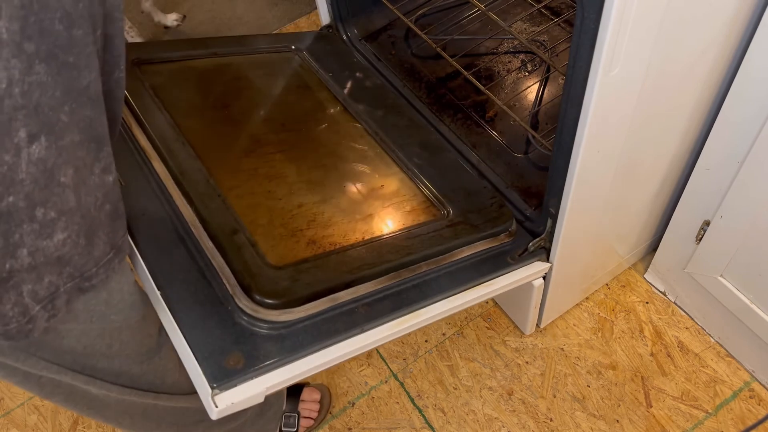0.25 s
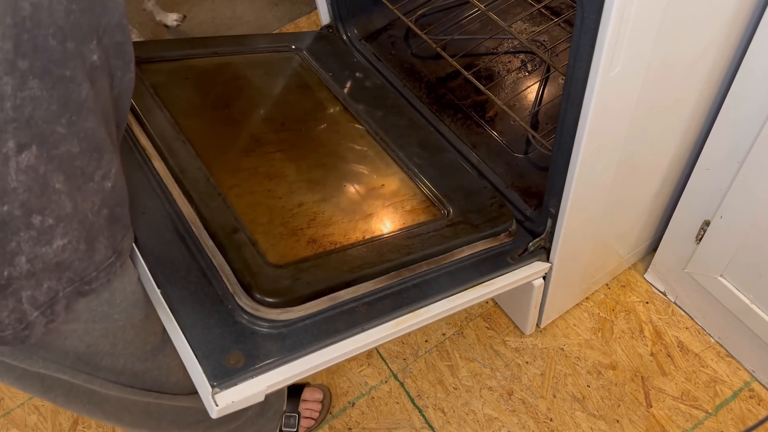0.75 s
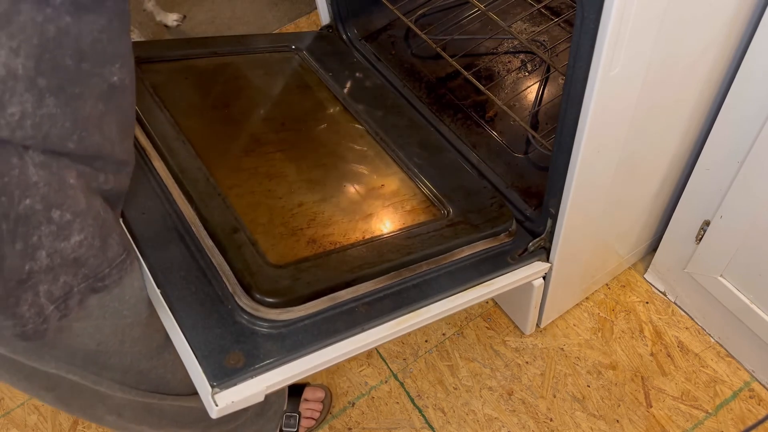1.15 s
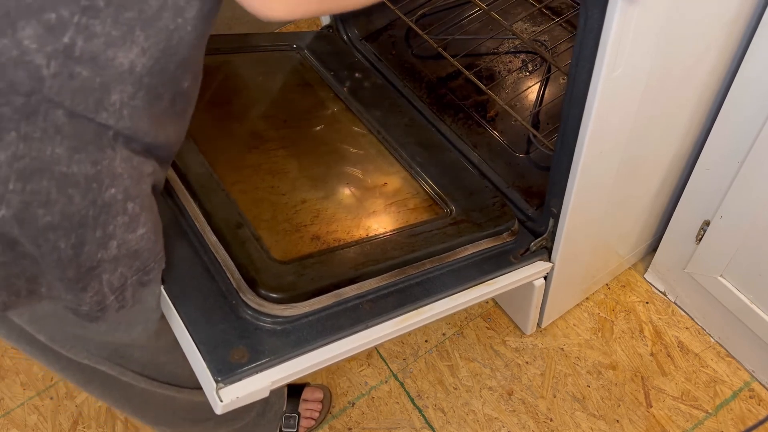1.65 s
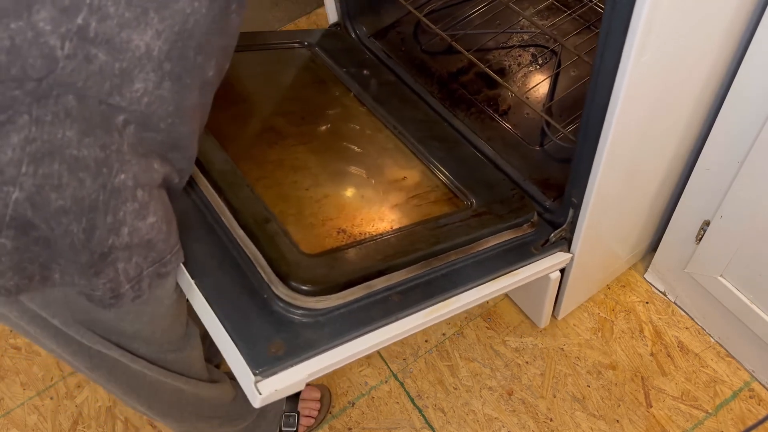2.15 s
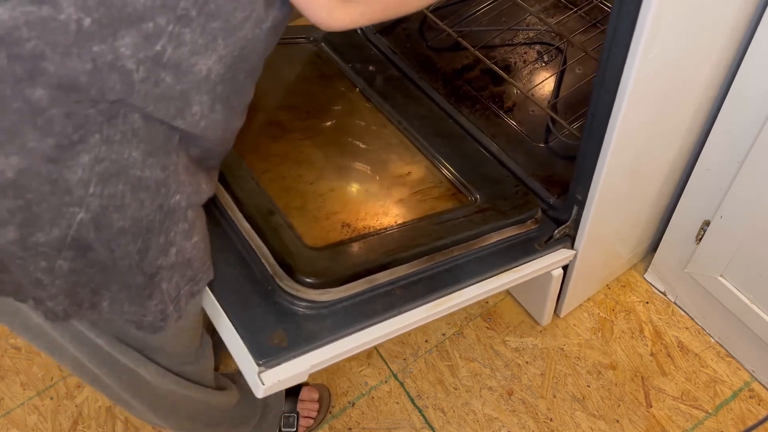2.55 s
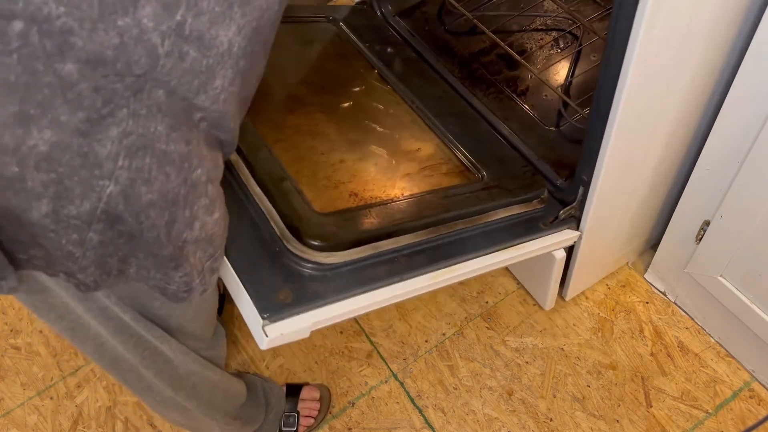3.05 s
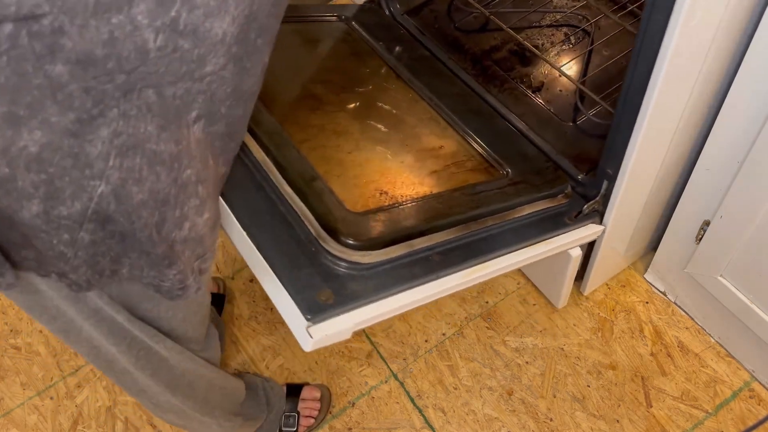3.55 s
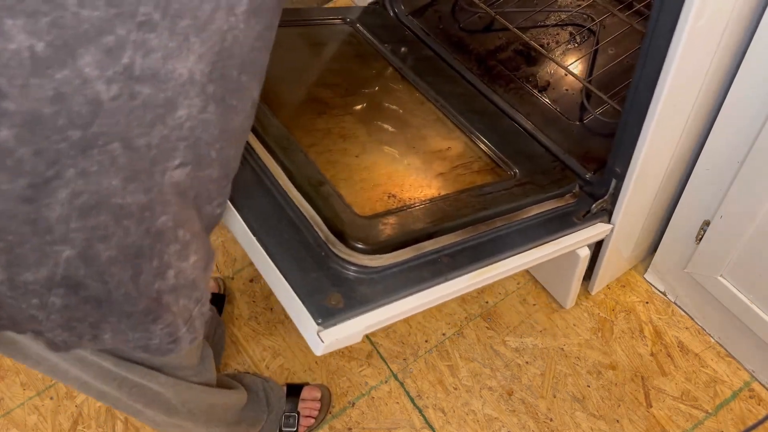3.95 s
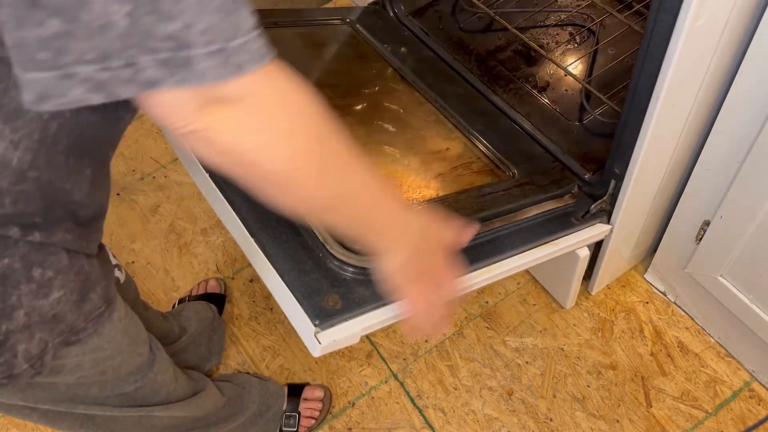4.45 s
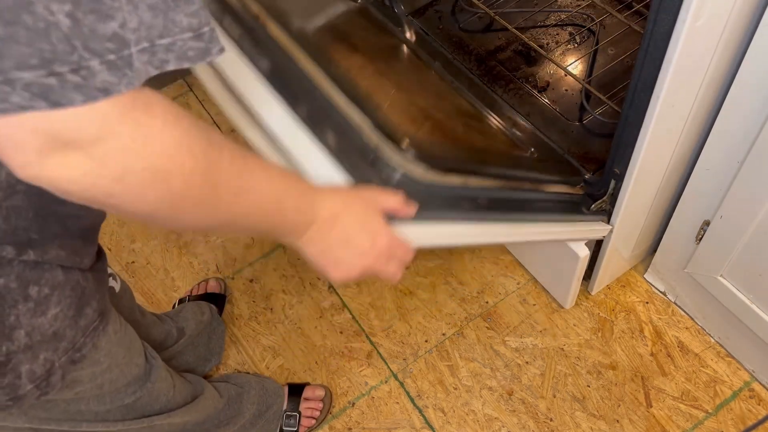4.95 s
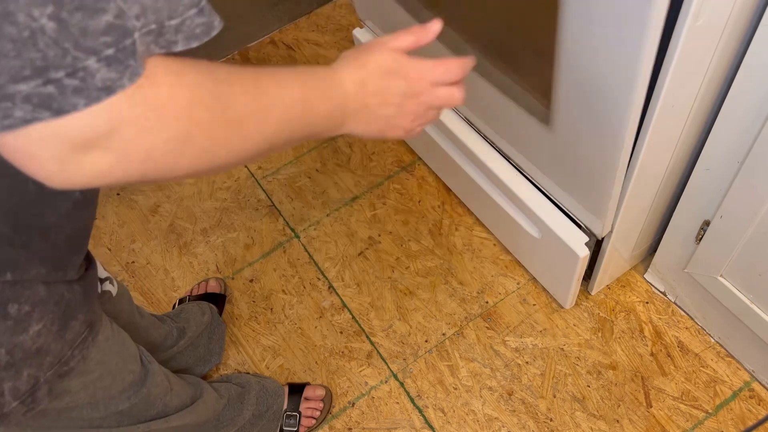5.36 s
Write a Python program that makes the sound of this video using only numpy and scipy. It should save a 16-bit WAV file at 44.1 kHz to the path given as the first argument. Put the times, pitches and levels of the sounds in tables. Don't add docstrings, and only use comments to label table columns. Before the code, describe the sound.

A quiet bare kitchen with a steady low hum around 120 Hz and soft air; a faint rustle fades within the first half second. At about 1.7 s a heavy sheet-metal stove is shoved: hollow panel bangs, the strongest near 1.8 s, with gritty skids and rack ticks until 2.0. A weaker scrape bridges to a knock at 2.5, then a dense run of loud clangs, scraping and bright rattles from 2.65 to 3.4 s, with low floor booms beneath. Lighter knocks and ticks follow at 3.6, 3.8 and 3.9. At 4.1 a short rubbery hinge squeak leads into a dull thump at 4.23; a small bump comes at 4.67. After a lull, the door touches its frame from 5.27 and latches with a crisp clack at 5.4, rattling once more at 5.5. Short room echo; stereo microphone a metre away, stove leaning right.

```python
import sys
import numpy as np
from scipy import signal
from scipy.fft import rfft, irfft
from scipy.io import wavfile
from scipy.ndimage import uniform_filter1d

SR = 44100
rng = np.random.default_rng(int(sys.argv[2]) if len(sys.argv) > 2 else 0)


def store_wav(level_fs):
    pcm = np.round(np.clip(np.atleast_2d(level_fs), -1, 1) * 32767)
    wavfile.write(sys.argv[1], SR, pcm.T.astype(np.int16))


def invert_db(x):
    u = np.asarray(x, float) / 20
    return 10 ** u


N = 247180
HZ = np.fft.rfftfreq(N, 1 / SR)
TIME = np.arange(N) / SR
RISE_S = .0004

# (frequency [Hz], level [dB], t60 [s])
PANELS = [(152, -11.5, 0.32), (213, -1, 0.07), (248.5, -8, 0.084), (308, -4, 0.072), (400, -10, 0.15),
          (450, -12, 0.44), (528.4, -2.5, 0.05), (610, -1, 0.053), (705, -3, 0.6), (774, -26, 0.13),
          (857, 5.5, 0.13), (1043, 1, 0.18), (1187, -9.5, 0.27), (1288, 1.5, 0.14), (1490, -19, .2),
          (1520, -14.5, 0.1), (1780, -24, 0.11), (1880, -17, 0.11)]
# (frequency [Hz], correlation [-1..1])
SAME = [(30, .996), (60, .95), (120, .95), (340, .72), (860, .42), (1400, .25), (2000, .15), (7000, .1)]


def evened(x):
    return x / np.sqrt(np.mean(x ** 2) + 1e-20)


def read(points, hz):
    f, value = np.transpose(points)
    return np.interp(np.log(hz + 1), np.log(f + 1), value)


def add(mix, s, sound):
    part = mix[..., round(s * SR):][..., :sound.shape[-1]]
    part += sound[..., :part.shape[-1]]


def paired(gain):
    left, other = rfft(rng.standard_normal((2, N)))
    same = np.clip(read(SAME, HZ), -1, 1)
    right = same * left + np.sqrt(1 - same ** 2) * other
    return evened(irfft(gain * np.array([left, right]), N))


def peak(hz, width):
    return 1 / np.sqrt(1 + (2 * (HZ - hz) / width) ** 2)


def rings(modes, t, scatter_db):
    hz, db, t60 = np.transpose(modes)[:, :, None]
    luck, phase, turn = rng.standard_normal((3, len(modes), 1))
    skew = np.arccos(np.clip(read(SAME, hz), -1, 1)) * .6 * np.sign(turn)
    size = invert_db(db + scatter_db * luck - 60 * t / t60)
    pair = [(size * np.sin(2 * np.pi * hz * t + phase + side * skew)).sum(0) for side in (0, 1)]
    return np.array(pair) / np.sqrt((size[:, 0] ** 2).sum())


def struck(t, rise, hold, t60):
    decay = invert_db(-60 * np.maximum(t - hold, 0) / np.clip(t60, .03, 2))
    return (1 - np.exp(-t / rise)) * decay


def clusters(blows):
    out, t = np.zeros((2, N)), np.arange(16000) / SR
    for s, hz, db, t60, hold in blows:
        cluster = [(hz, 0, 9), (hz * 1.03 + 8, -9, 9), (hz * .955 - 8, -10, 9), (hz * 1.075 + 15, -12, 9)]
        unrest = evened(uniform_filter1d(rng.standard_normal(len(t)), size=300))
        chatter = invert_db(2 * unrest * np.minimum(t / .02, 1))
        ring = rings(cluster, t, scatter_db=1.5) * chatter
        add(out, s, invert_db(db) * ring * struck(t, 2 * RISE_S, hold, t60))
    return out


def room_tone():
    # (frequency [Hz], level [dB per Hz])
    air = [(12, -38), (20, -14.5), (70, -8.5), (123, -5.5), (146, -8), (177, -15), (310, -14), (450, -24.5),
           (897, -28), (1330, -28), (3000, -34.5), (6500, -43), (8200, -52.5), (16000, -91)]
    # (frequency [Hz], level [dB], width [Hz; first: wobble dB])
    hum = [(120.06, -44, .6), (57.2, -51.5, 5.7), (243.3, -66, 1.3), (309, -62, 4.4), (506.2, -64, 3.8),
           (652, -68, 5.3), (901, -65.5, 16)]
    fan = sum(invert_db(db) * paired(peak(hz, width) ** 2) for hz, db, width in hum[1:])
    hz, db, wobble_db = hum[0]
    drift = evened(uniform_filter1d(rng.standard_normal(N), size=9000))
    side_db = np.array([[.7], [-.7]])
    mains = invert_db(db + wobble_db * drift + side_db) * np.sqrt(2) * np.sin(2 * np.pi * hz * TIME)
    return invert_db(-50.5) * paired(invert_db(read(air, HZ))) + fan + mains


def slide(grit, wash, chatter, boom):
    # (time [s], level over rest [dB])
    shove = [(1.55, 0.1), (1.68, 5), (1.85, 16), (1.92, 15), (2.02, 7), (2.2, 6.5), (2.46, 3), (2.71, 15),
             (2.82, 12), (3.04, 15), (3.17, 12), (3.28, 18), (3.5, 12), (3.85, 11.5), (4.07, 5.5),
             (4.8, 0.8), (5.25, 2), (5.6, 9.5)]
    # (start [s], length [s], grit level [dB], panel chatter level [dB])
    skids = [(1.70, .09, -51, -56), (1.77, .07, -46, -50), (1.87, .06, -50, -55), (1.95, .09, -50, -50),
             (2.07, .25, -57.5, -53), (2.335, .12, -66, -56), (2.66, .13, -45.5, -36), (2.76, .1, -54, -48),
             (2.84, .07, -47, -60), (2.935, .07, -44, -37), (3.06, .07, -55, -36), (3.31, .08, -55, -42),
             (4.06, .18, -61, -60), (4.23, .12, -61, -45), (4.3, .14, -62, -54), (4.42, .05, -70, -52),
             (4.46, .14, -64, -60), (4.65, .15, -71, -54), (5.0, .1, -75, -66), (5.47, .13, -65, -47)]
    push = np.interp(TIME, *np.transpose(shove))
    slips = uniform_filter1d(rng.standard_normal(N), size=250)
    slips = evened(uniform_filter1d(slips, size=250))
    scrape = invert_db(-83 + 3.3 * push - .065 * push ** 2)
    scrape = scrape + invert_db(-61 - 60 * TIME / .5)
    skid = np.zeros((2, N))
    for s, length, grit_db, chatter_db in skids:
        shape = signal.windows.tukey(round(length * SR), .8)
        add(skid, s, invert_db(np.array([[grit_db], [chatter_db]])) * shape)
    skid = skid * invert_db(1.2 * slips)
    grit_gain = np.hypot(scrape * invert_db(1.08 * slips), skid[0])
    drone = invert_db(-54 + push + 0.81 * slips) * wash
    rumble = invert_db(-68 + .6 * push) * boom
    return grit_gain * grit + skid[1] * chatter + drone + rumble


def bumps(low, high):
    # (time [s], peak level [dB], struck spot [Hz], upper panels relative to it [dB])
    blows = [(1.668, -35, 356, -3.5), (1.74, -30, 238, -14), (1.775, -16, 258, -9.5),
             (1.858, -24, 428, -19), (1.929, -37, 546, -7), (1.954, -35, 1070, 1.5), (2.481, -36, 240, -3),
             (2.549, -22.5, 546, -4.5), (2.659, -17, 252, -6), (2.719, -27.5, 198, -10),
             (2.917, -17.5, 533, -8.5), (3.025, -21, 232, -9.5), (3.129, -26.5, 1290, -14.5),
             (3.246, -23.5, 435, -8.5), (3.294, -21.5, 250, -19), (3.415, -30, 610, -9),
             (3.532, -30, 250, -9), (3.585, -30, 439, -12), (3.779, -37, 780, -5.5),
             (3.934, -32, 1297, -12), (4.235, -23.5, 225, -12), (4.665, -33, 323, -12),
             (5.27, -35.5, 369, -5), (5.349, -37, 315, -9), (5.417, -33.5, 1310, -6),
             (5.444, -32.5, 1076, -21), (5.509, -33, 844, -0.5)]
    out, t = np.zeros((2, N)), np.arange(20000) / SR
    modes = np.array(PANELS)
    upper = modes[:, 0] > 640
    for s, db, hz, bright_db in blows:
        cut = slice(round(s * SR), round(s * SR) + len(t))
        u = t[:low[:, cut].shape[1]]
        t60 = .27 - .004 * (db + 25)
        low_ring = rings(modes[~upper], u, scatter_db=3)
        high_ring = rings(modes[upper], u, scatter_db=3)
        spot = rings([(hz, 0, .16), (hz * 1.2, -5, .12)], u, scatter_db=2)
        late = 1 - np.exp(-(u / .004) ** 2)
        ring = late * invert_db(-8.5) * (low_ring + spot) + invert_db(bright_db - 8) * high_ring
        dense = late * invert_db(-12.5) * low[:, cut] + invert_db(bright_db - 5) * high[:, cut]
        blow = ring * struck(u, .00086, .0048, 3 * t60) + dense * struck(u, .001, .0046, t60)
        add(out, s - .003, invert_db(db) * blow)
    return out


def clangs():
    # (time [s], frequency [Hz], level [dB], contact length [s])
    panel_blows = [(1.7705, 875, -26, .01), (1.7705, 1300, -33, .01), (1.798, 1282, -36, .028),
                   (1.772, 1840, -39, .014), (1.778, 235, -26, .02), (2.05, 1560, -48, .015),
                   (2.55, 1280, -32.5, .03), (2.55, 812, -34.5, .006), (2.55, 1100, -35, .01),
                   (2.556, 570, -37, .01), (2.6575, 710, -26, .018), (2.6575, 849, -28, .013),
                   (2.6575, 1450, -25, .012), (2.6575, 1163, -31, .012), (2.658, 1288, -28, .03),
                   (2.659, 1520, -30.5, .025), (2.668, 166.5, -31.5, .045), (2.916, 1277, -34, .02),
                   (3.023, 1198, -31.5, .011), (3.03, 563, -37, .02), (3.031, 1780, -42.5, .014),
                   (3.132, 1288, -46, .033), (3.233, 1001, -38.5, .018), (3.299, 860, -26.5, .034),
                   (3.297, 1288, -34, .025), (3.305, 1040, -37, .025), (3.245, 430, -32, .015),
                   (3.378, 1060, -41, .02), (3.342, 2350, -48, .015), (3.85, 930, -45, .025),
                   (3.94, 860, -48, .03), (2.70, 1520, -36, .025), (2.72, 1480, -39, .03),
                   (2.662, 255, -22.5, .03), (4.234, 930, -41, .006), (4.66, 1000, -50, .008),
                   (2.918, 560, -32, .015), (2.918, 860, -32, .015), (3.415, 860, -41, .01),
                   (3.586, 1310, -42, .007), (3.778, 1414, -45, .031), (3.936, 1285, -44, .048),
                   (4.245, 600, -43, .03), (4.233, 290, -27.5, .018), (4.25, 370, -39, .02),
                   (4.662, 418, -41, .008), (5.272, 900, -46, .006), (5.349, 1100, -46, .005),
                   (2.481, 1000, -45, .005), (1.667, 950, -47, .01)]
    return clusters([(s, hz, db, .12, hold) for s, hz, db, hold in panel_blows])


def ticks(grit, snap):
    # (time [s], peak level [dB], ring [Hz], snap relative to it [dB])
    hits = [(1.672, -46.5, 3400, -23), (1.714, -58, 3540, -17), (1.744, -44, 5700, -5),
            (1.862, -38.5, 5170, -6), (1.882, -44, 3100, -6), (1.929, -33, 6700, -9),
            (1.948, -29.5, 6300, -6.5), (1.996, -43, 4040, -14), (2.285, -54, 3100, -20),
            (2.3396, -54, 3110, -25), (2.4763, -46, 5900, -31), (2.543, -43, 3260, -25),
            (2.666, -36.5, 3340, -9), (2.85, -34, 5400, -12), (2.9264, -22.5, 5470, -9.5),
            (3.0858, -28.5, 3320, -10), (3.129, -29, 4720, -10), (3.228, -30.5, 2870, -17),
            (3.274, -33.5, 2990, -11.5), (3.2938, -24, 5870, -10), (3.4137, -29, 3610, -11),
            (3.5828, -29.5, 6600, -10), (3.6361, -35, 5060, -9), (3.701, -41, 6130, -8),
            (3.7756, -32, 2770, -16), (3.934, -33, 5890, -10), (4.0, -47, 3320, -21),
            (4.23, -44, 4300, -26), (5.3486, -39, 4660, -21), (5.415, -22, 2900, -12),
            (5.5093, -28.5, 4750, -10)]
    # (frequency [Hz], level [dB], t60 [s])
    racks = [(3100, -6, 0.055), (3500, -7, 0.066), (5650, -4, 0.11), (5880, -7.5, 0.086),
             (6240, -4.5, 0.17), (6550, -11, 0.075)]
    out, t = np.zeros((2, N)), np.arange(14000) / SR
    for s, db, hz, snap_db in hits:
        cut = slice(round(s * SR), round(s * SR) + len(t))
        u = t[:grit[:, cut].shape[1]]
        crack = invert_db(-13.5) * grit[:, cut] + invert_db(snap_db - 2) * snap[:, cut]
        crack = crack * struck(u, RISE_S, .0055, .04)
        tail = grit[:, cut] * struck(u, .009, .025, .24)
        wires = rings([*racks, (hz, 3, .06)], u, scatter_db=0)
        add(out, s, invert_db(db) * (crack + invert_db(-17) * tail + invert_db(-11.5) * wires))
    return out


def scuffs():
    # (start [s], length [s], level [dB], resonance [Hz], width [Hz])
    rubs = [
        (4.12, .13, -53, 1650, 800),
        (4.125, .18, -62, 2640, 250),
        (1.715, .06, -55, 3300, 1200),
        (4.0, .04, -66, 3600, 300),
        (3.77, .16, -55, 2300, 1400),
        (3.95, .12, -58, 2300, 1400),
    ]
    out = np.zeros((2, N))
    slips = evened(uniform_filter1d(rng.standard_normal(SR), size=300))
    for s, length, db, hz, width in rubs:
        shape = signal.windows.tukey(round(length * SR), .5)
        whistle = paired(peak(hz, width) ** 2)[:, :len(shape)]
        add(out, s, invert_db(db) * whistle * shape * invert_db(2.5 * slips[:len(shape)]))
    return out


def thuds(boom):
    # (time [s], level [dB])
    landings = [(1.74, -42.5), (1.775, -43), (1.83, -34), (2.658, -34.5), (2.69, -36), (2.917, -32.5),
                (3.025, -42), (3.246, -37), (3.35, -40), (3.296, -42), (3.414, -41), (3.586, -42.5),
                (3.934, -44), (4.665, -50), (5.268, -39), (5.43, -45)]
    return boom * sum(invert_db(db) * struck(np.maximum(TIME - s, 0), .048, .054, .34) for s, db in landings)


def squeaks():
    # (start [s], length [s], level [dB], pitch [Hz])
    tones = [
        (4.13, .17, -58, 2630),
        (4.13, .12, -71, 4300),
        (4.13, .09, -56, 1500),
        (4.15, .06, -57, 1850),
        (4.705, .07, -68, 3350),
        (2.03, .09, -68, 3350),
    ]
    out = np.zeros((2, N))
    for s, length, db, hz in tones:
        waver, flicker = [evened(v) for v in uniform_filter1d(rng.standard_normal((2, 9000)), size=250)]
        shape = signal.windows.tukey(round(length * SR), .3)
        turns = np.cumsum(hz * (1 + .014 * waver)) / SR
        tone = np.sqrt(2) * invert_db(db + 3 * flicker) * np.sin(2 * np.pi * turns + [[0], [1.2]])
        add(out, s, tone[:, :len(shape)] * shape)
    return out


def cracks(grit, snap):
    # (time [s], level [dB], top treble level [dB], contact length [s])
    contacts = [
        (5.4148, -29, -32, .003),
        (5.32, -72, -65, .004),
        (5.3495, -54, -60, .002),
        (3.4155, -44, -48, .002),
        (2.9255, -40, -38, .002),
        (3.0858, -48, -42, .002),
        (3.129, -48, -42, .002),
        (3.274, -50, -43, .002),
        (3.5828, -46, -41, .002),
    ]
    out = np.zeros((2, N))
    for s, db, top_db, hold in contacts:
        shape = struck(np.maximum(TIME - s, 0), RISE_S, hold, .03)
        out += (invert_db(db) * grit + invert_db(top_db) * snap) * shape
    return out


def slam():
    # (time [s], frequency [Hz], level [dB])
    parts = [(5.269, 365, -41), (5.415, 1322, -37), (5.415, 1950, -36), (5.422, 1846, -40),
             (5.415, 3080, -33), (5.416, 2800, -36), (5.415, 4600, -43), (5.415, 6480, -36),
             (5.42, 1389, -37), (5.425, 3450, -43), (5.51, 4200, -46), (5.54, 700, -41), (5.52, 1500, -41),
             (5.44, 61.7, -32.5), (5.44, 477, -39.5), (5.435, 1006, -40), (5.49, 687, -40),
             (5.515, 857, -39), (5.522, 1313, -43.5)]
    return clusters([(s, hz, db, .085 * (1000 / hz) ** .4, .007 - .0012 * (db + 30)) for s, hz, db in parts])


def kitchen(x):
    # (frequency [Hz], t60 [s])
    decay_times = [(100, 0.17), (1000, 0.35), (4000, 0.47), (12000, 0.29)]
    taps = np.zeros((2, SR))
    at = np.arange(300, SR - 20, 20) + rng.integers(0, 20, (2, (SR - 301) // 20))
    np.put_along_axis(taps, at, rng.choice([-1., 1.], at.shape), 1)
    hz, t, z = signal.stft(taps, SR, nperseg=256)
    same = np.clip(read(SAME, hz), -1, 1)[:, None]
    z[1] = same * z[0] + np.sqrt(1 - same ** 2) * z[1]
    fade = invert_db(-60 * t / read(decay_times, hz)[:, None])
    tail = signal.istft(z * fade, SR, nperseg=256)[1]
    return signal.fftconvolve(x.mean(0)[None], tail / np.linalg.norm(tail[0]), axes=1)[:, :N]


def scene():
    # (frequency [Hz], level [dB per Hz])
    body = [(60, -37), (100, 3), (260, -1), (400, -1.5), (860, -3), (1500, -5), (1650, -6), (1900, -10),
            (2600, -13.5), (5000, -27), (9000, -64)]
    # (frequency [Hz], level [dB per Hz])
    grit_color = [(900, -8.5), (1500, -0.5), (2200, -2), (4200, -6.5), (6500, -8.5), (7200, -11.5),
                  (9000, -19), (11000, -15), (13000, -13.5), (15300, -16.5), (16100, -30), (16900, -59)]
    # (frequency [Hz], left minus right [dB])
    lean_db = [(60, .8), (340, -.7), (860, -2.3), (1400, -3), (2900, -2.3), (4000, -5), (5500, -10.5),
               (6500, -9), (7100, -4), (8600, 0)]
    panel = invert_db(read(body, HZ)) * (1 + sum(1.04 * invert_db(db) * peak(hz, 22) for hz, db, _ in PANELS))
    upper = 1 / (1 + (640 / (HZ + 1)) ** 6)
    low, high, wash = paired(panel * (1 - upper)), paired(panel * upper), paired(panel)
    rough = invert_db(read(grit_color, HZ))
    grit, snap = paired(rough), paired(rough * (HZ > 7500))
    boom = paired(peak(70.3, 40) ** 2)
    hits = bumps(low, high) + clangs() + ticks(grit[:, ::-1], snap) + scuffs()
    hits = hits + thuds(boom[:, ::-1]) + squeaks() + cracks(grit, snap[:, ::-1]) + slam()
    stove = hits + invert_db(-8) * kitchen(hits) + slide(grit, wash, wash[:, ::-1], boom)
    lean = invert_db(np.array([[.5], [-.5]]) * read(lean_db, HZ))
    lag = np.exp(-2j * np.pi * HZ * [[9 / SR], [0]])
    return irfft(rfft(stove) * lean * lag, N) + room_tone()


def band_limit(x):
    return signal.sosfilt(signal.butter(12, 16750, fs=SR, output="sos"), x)


def record(dry):
    treble_hz, in_step_hz, comb_hz, edge_hz = 8000, 11200, 4450, 16000
    hz, t, z = signal.stft(dry, SR, nperseg=1024, noverlap=768)
    top = hz > treble_hz
    turn = -np.pi * (hz[:, None] - in_step_hz) / comb_hz
    treble_db = 10 * np.log10((abs(z[0, top]) ** 2).sum(0) + 1e-14)
    attack = treble_db - np.roll(treble_db, 2) > 9
    calm = uniform_filter1d(1. * attack, size=2) == 0
    cut = rng.uniform([.2, .45], [.65, .85], (len(t) // 6 + 1, 2))
    cut = np.repeat(cut, 6, axis=0)[:len(t)].T
    total = np.cos(turn) * ~((abs(np.cos(turn)) < cut[0]) & calm)
    apart = .85 * np.sin(turn) * ~((abs(np.sin(turn)) < cut[1]) & calm)
    inside = ~((hz[:, None] > edge_hz) & calm)
    treble = z[0] * inside * np.array([total - 1j * apart, total + 1j * apart])
    z[:, top] = treble[:, top]
    mix = signal.istft(z, SR, nperseg=1024, noverlap=768)[1][:, :N]
    return band_limit(mix)


dry = scene()
out = record(dry)
store_wav(out)
```